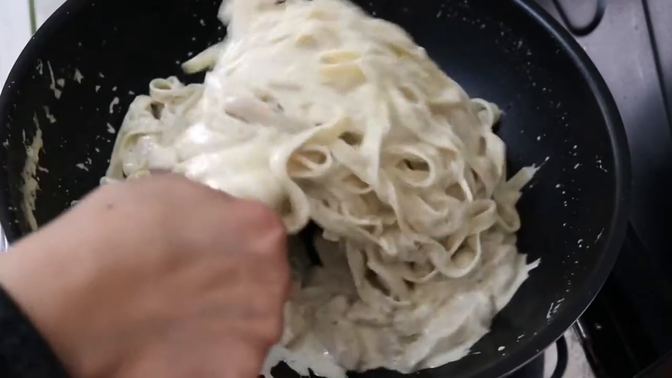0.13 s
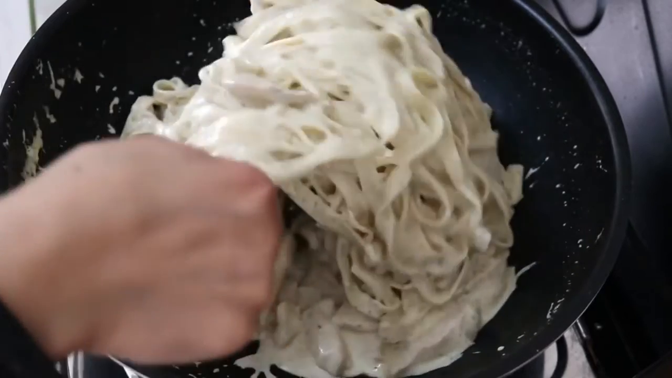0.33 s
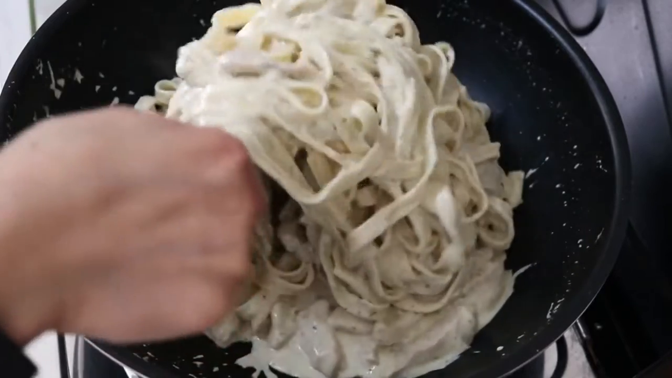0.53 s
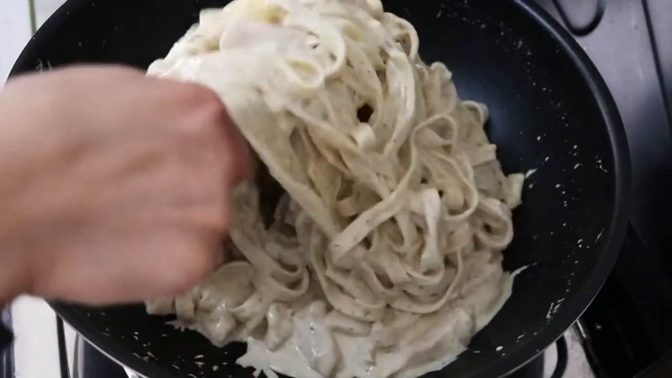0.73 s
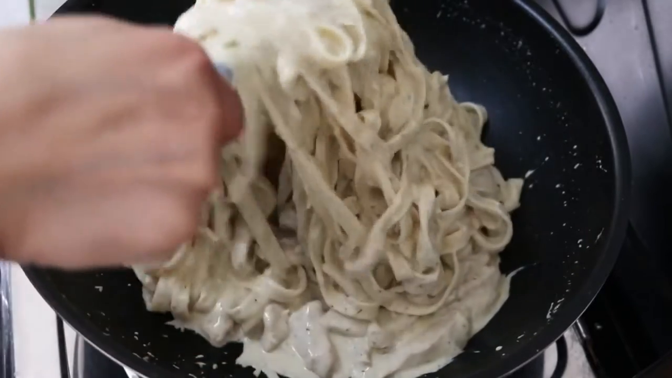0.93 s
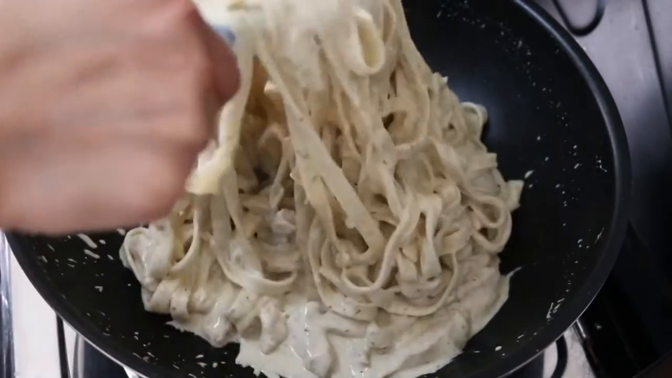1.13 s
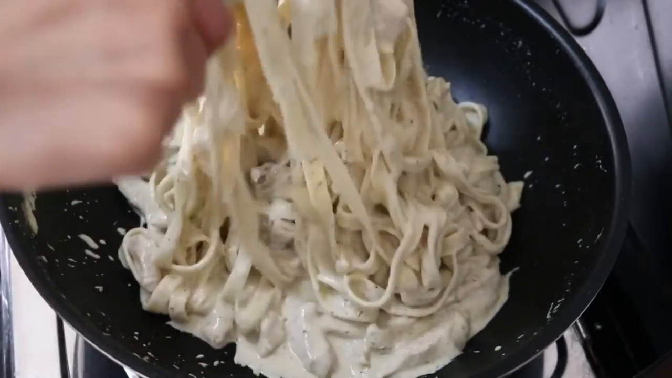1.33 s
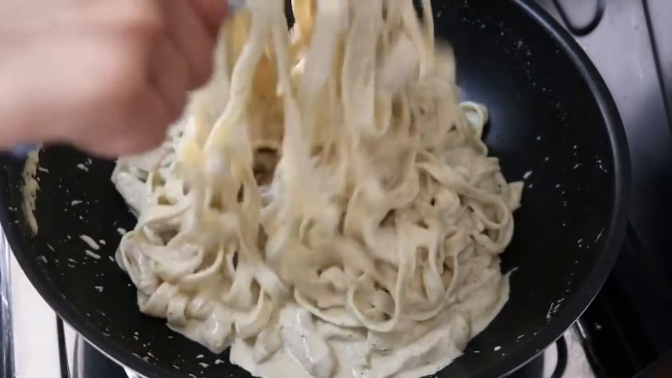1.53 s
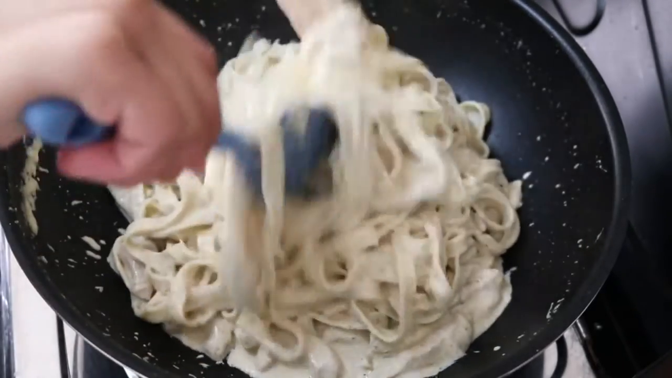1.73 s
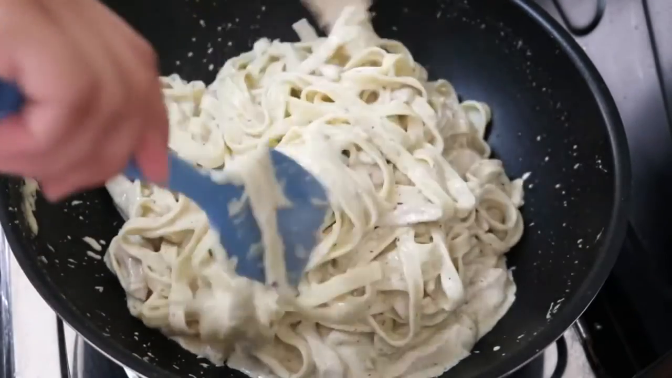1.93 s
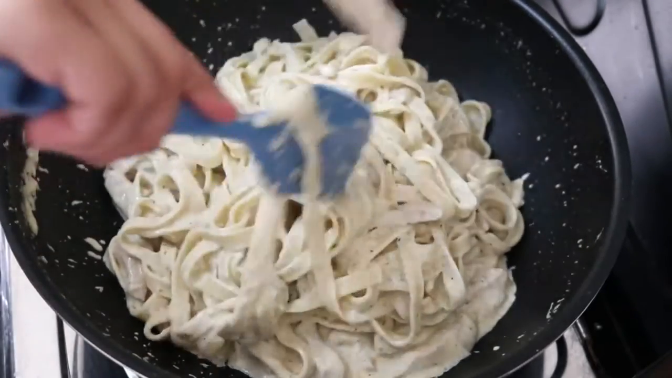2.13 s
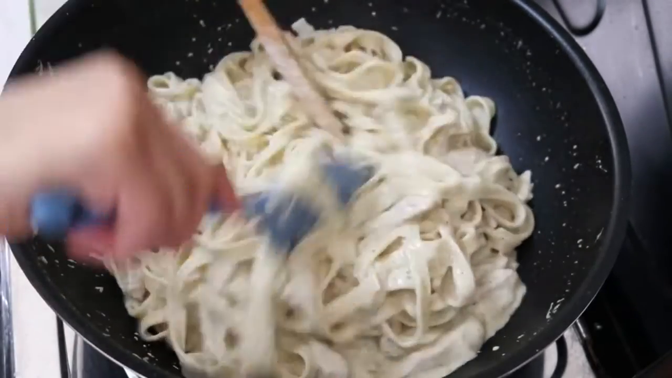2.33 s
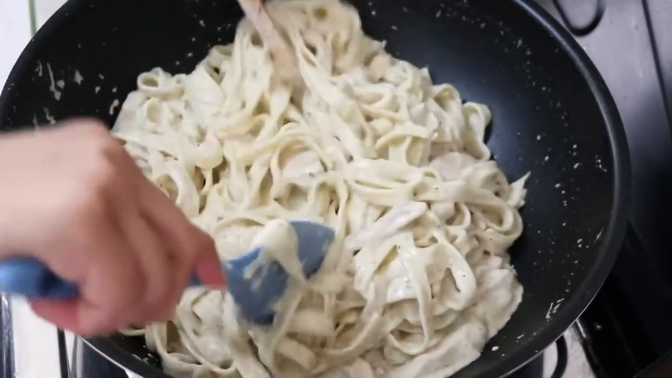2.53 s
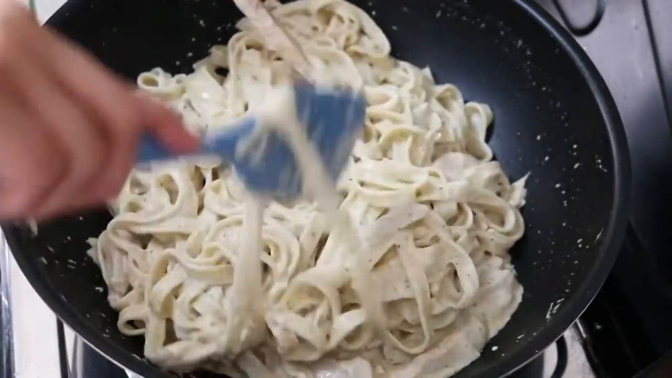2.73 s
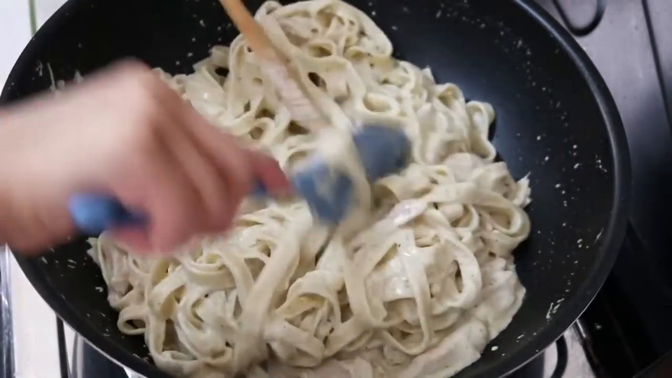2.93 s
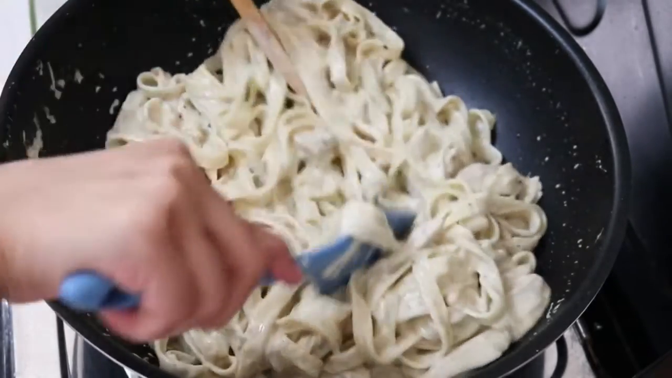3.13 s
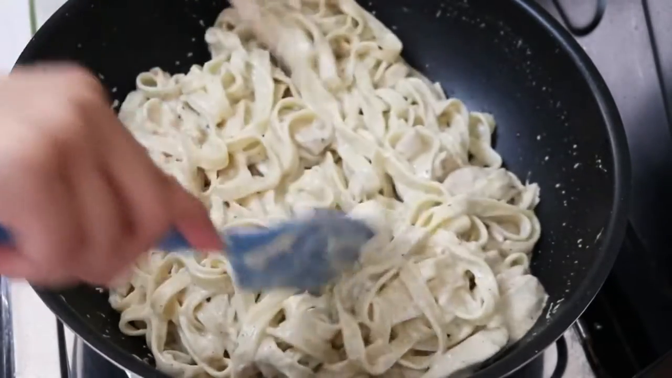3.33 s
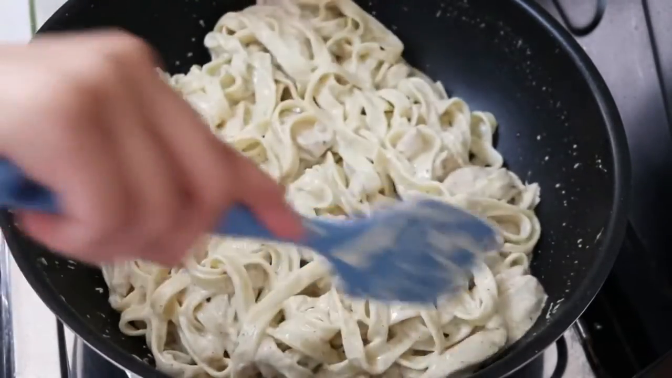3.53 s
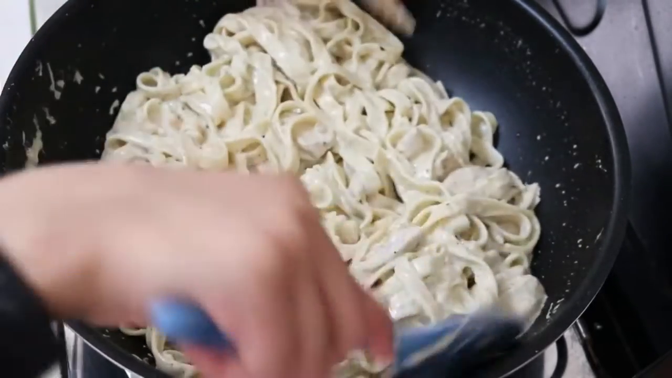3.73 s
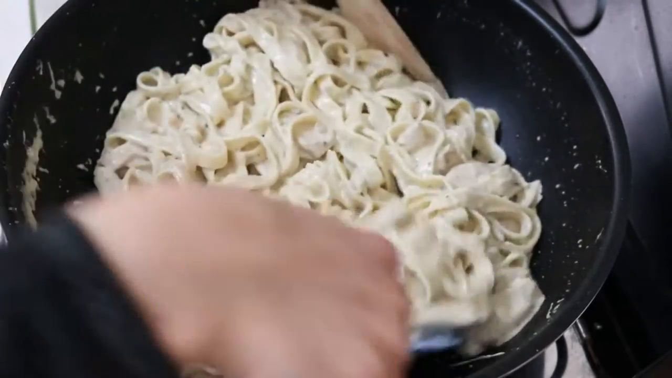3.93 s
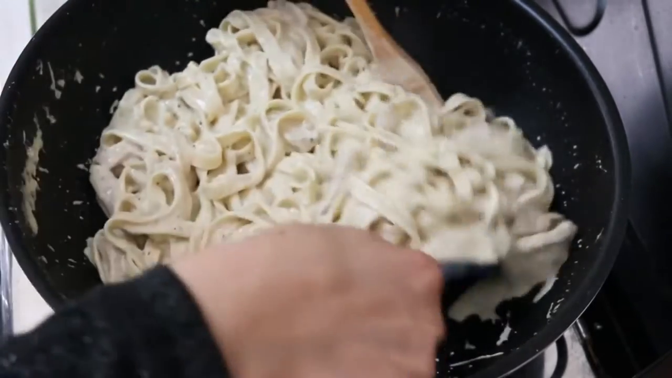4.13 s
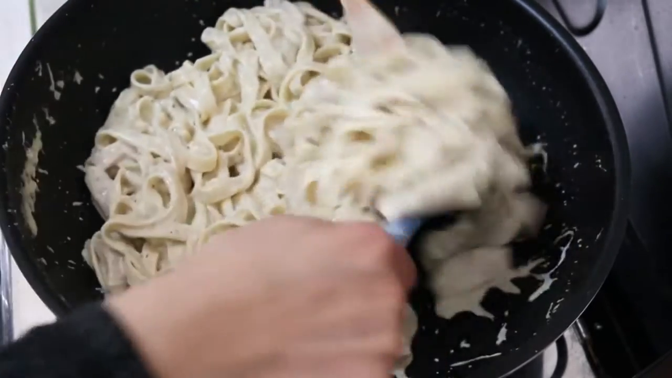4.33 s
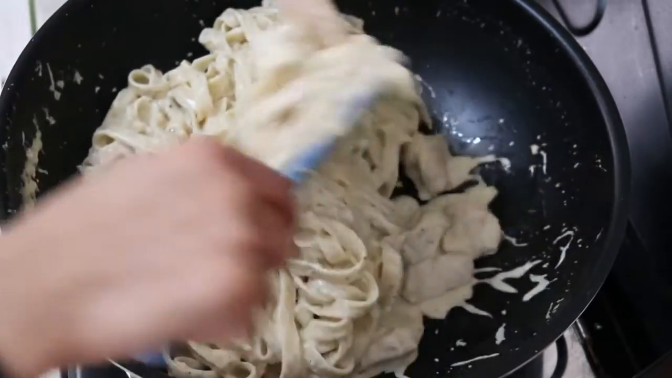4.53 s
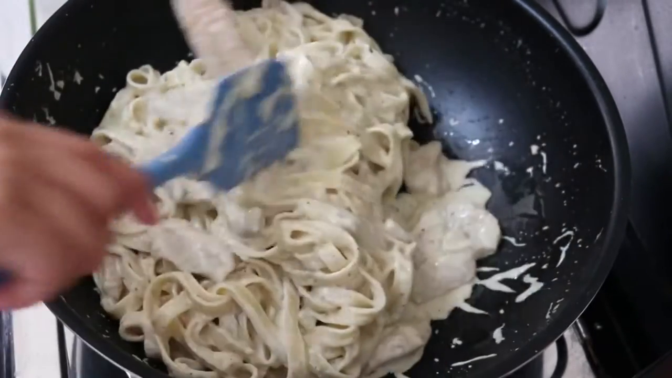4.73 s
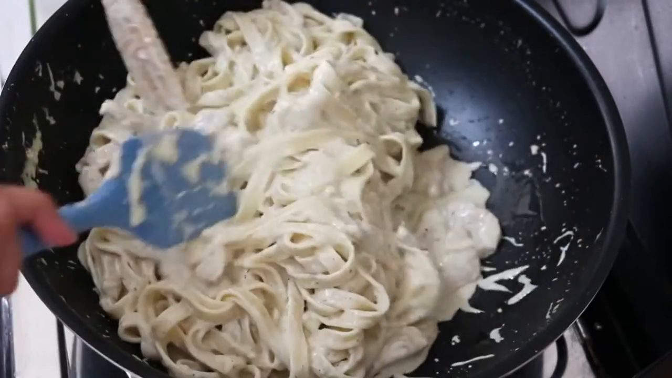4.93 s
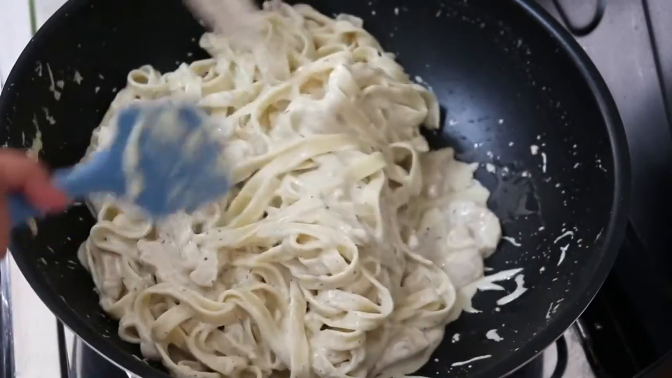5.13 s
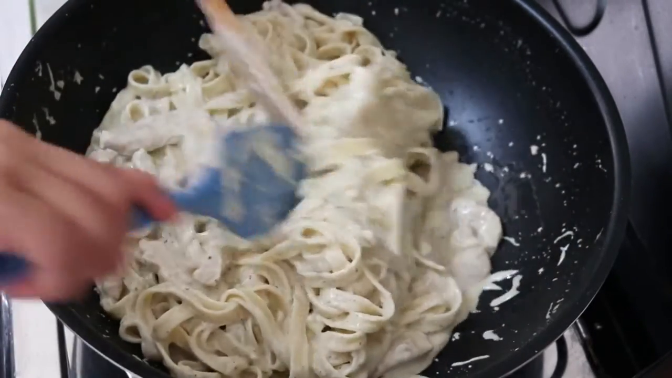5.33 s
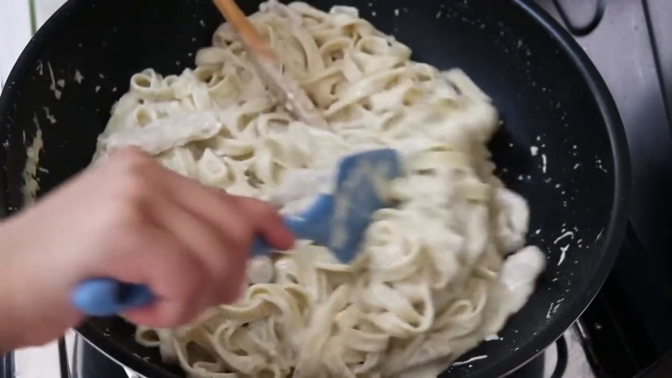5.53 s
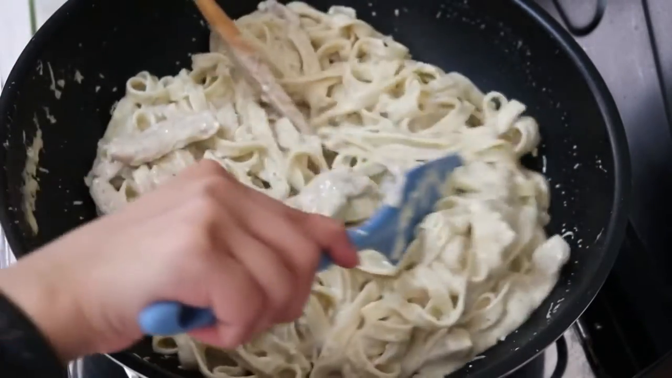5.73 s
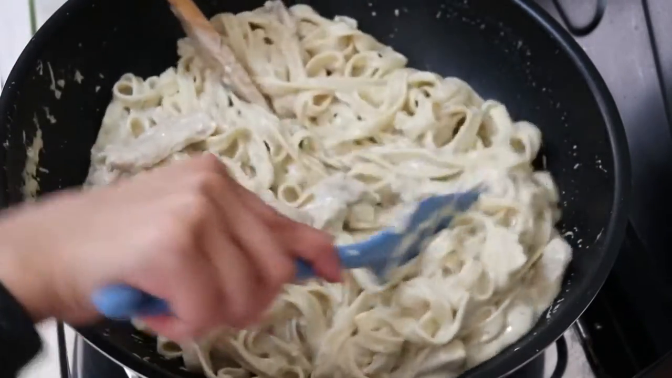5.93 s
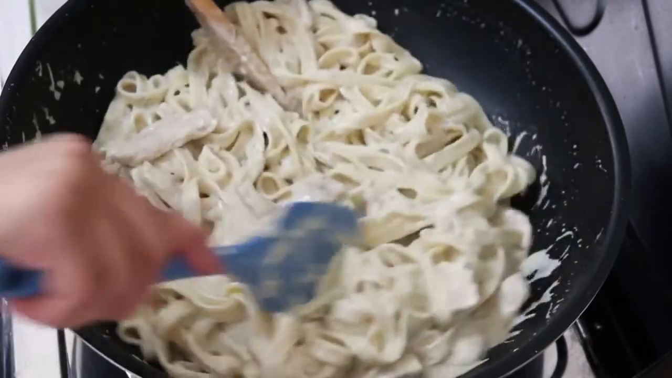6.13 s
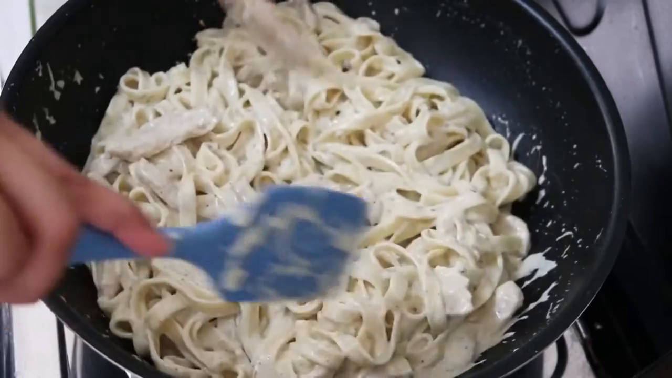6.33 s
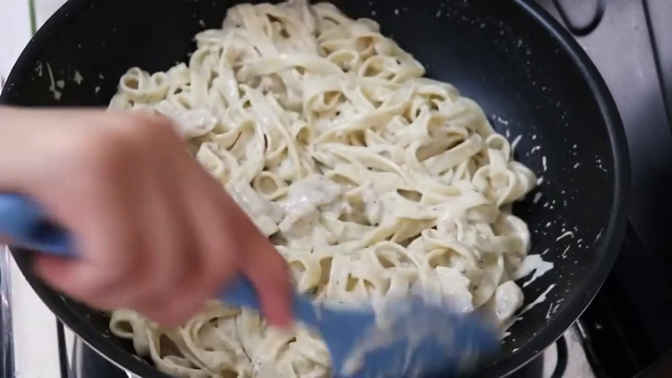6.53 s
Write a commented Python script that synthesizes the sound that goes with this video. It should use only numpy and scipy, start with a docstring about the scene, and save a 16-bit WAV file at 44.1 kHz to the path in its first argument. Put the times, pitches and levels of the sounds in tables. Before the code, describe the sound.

Close, sticky wet stirring of saucy noodles, full of small pops and ticks, with muted pan knocks and a soft appliance hum behind.

```python
"""Pasta in thick cream sauce is lifted, dropped and stirred in a deep pan in a home kitchen.
Air pockets burst as short ringing tones, singly or massed into a squelch; sauce films tick, a tool rubs.
Knocks of the tools ring the food-damped pan as a set of decaying modes with a noisy rattle.
The microphone hears the pan in the middle, without room echo; an appliance hums in sine tones
under a faint stereo hiss of filtered noise."""
import sys
import numpy as np
from scipy import signal
from scipy.io import wavfile

SR = 44100
rng = np.random.default_rng(int(sys.argv[2]) if len(sys.argv) > 2 else 0)


def magnitude_from_level(level_db):
    """Linear magnitude for a level in decibels (20 dB per decade)."""
    exponent = np.asarray(level_db, float) / 20
    return 10 ** exponent


def master(y):
    """Save y as 16-bit WAV."""
    cut = np.clip(np.atleast_2d(y).T, -1, 1)
    pcm = np.round(cut * 32767)  # scale
    wavfile.write(sys.argv[1], SR, pcm.astype(np.int16))


N = 290619


def rms_one(x):
    """Scaled to rms 1."""
    return x / np.sqrt(np.mean(x ** 2) + 1e-20)


def at_hz(points, hz):
    """A (frequency [Hz], value) table read on a log frequency axis."""
    table_hz, values = np.transpose(points)
    return np.interp(np.log(hz), np.log(table_hz), values)


def drift(rate_hz):
    """Slow random wander of rms 1, from twice-smoothed noise at one value per 40 samples."""
    r = np.exp(-80 * np.pi * rate_hz / SR)
    noise = rng.standard_normal(N // 40 + 2002)
    slow = signal.lfilter([1], [1, -2 * r, r * r], noise)[2000:]   # the filter has settled
    return np.interp(np.arange(N) / 40, np.arange(len(slow)), rms_one(slow))


def band_pass(x, low_hz, high_hz):
    """Keeps the sound between two frequencies."""
    return signal.sosfilt(signal.butter(2, [low_hz, high_hz], "band", fs=SR, output="sos"), x)


def high_pass(x, low_hz):
    """Keeps the sound above a frequency."""
    return signal.sosfilt(signal.butter(2, low_hz, "high", fs=SR, output="sos"), x)


def ring(clicks, hz, t60):
    """A resonance: a unit click sets a sine of height about 1 ringing, 60 dB down after t60 seconds."""
    r, w = magnitude_from_level(-60 / (t60 * SR)), 2 * np.pi * hz / SR
    return signal.lfilter([0, np.sin(w)], [1, -2 * r * np.cos(w), r * r], clicks + 1e-18)


def dying_noise(clicks, low_hz, high_hz, t60):
    """Every click starts a band of noise that dies away, 60 dB down after t60 seconds."""
    envelope = signal.lfilter([1], [1, -magnitude_from_level(-60 / (t60 * SR))], clicks + 1e-18)
    noise = band_pass(envelope * rng.standard_normal(N), low_hz, high_hz)
    return noise * np.sqrt(SR / 2 / (high_hz - low_hz))   # level independent of bandwidth


def hiss():
    """Half-octave bands of noise, each wavering slightly; the two sides share the bass most."""
    # spectrum of the hiss: (frequency [Hz], relative density [dB per Hz])
    spectrum = [(25, -1), (50, -5.5), (100, 1), (180, -7), (350, -7), (700, -13.5), (1400, -16),
                (2800, -19), (5600, -18.5), (9000, -17.5), (13000, -25), (16000, -18.5)]
    # stereo width of the hiss: (frequency [Hz], side minus mid [dB])
    side_share = [(60, -20), (300, -12), (1000, -7.5), (3000, -3.5), (7500, -3), (9000, -11), (14000, -9.5)]
    level_db, waver_db = -67.5, 0.4
    out, edges = 0, 25 * 2 ** np.arange(0, 9.6, .5)
    white = rng.standard_normal((2, 2, N))   # alternate bands use separate noise
    for k, (low, high) in enumerate(zip(edges, edges[1:])):
        mid, side = band_pass(white[k % 2], low, high)
        hz = np.sqrt(low * high)
        both = mid + magnitude_from_level(at_hz(side_share, hz)) * side * [[1], [-1]]
        out = out + magnitude_from_level(at_hz(spectrum, hz) + waver_db * drift(13.0)) * both
    return magnitude_from_level(level_db) * rms_one(out)


def hum():
    """The appliance: a nearly steady motor tone, and a low hum of uneven level under it."""
    # the low hum's level: (time [s], level [dB rms])
    low_levels = [(0.0, -77), (0.22, -69), (0.62, -84), (0.99, -67), (1.27, -81), (1.72, -64.5),
                  (1.78, -74), (2.88, -75), (3.01, -66), (4.2, -77), (4.37, -65), (4.68, -76.5),
                  (6.52, -74), (6.59, -100)]
    motor_hz, low_hz, motor_db, waver_db = 295.4, 99.5, -70, 1
    t = np.arange(N) / SR
    s, low_db = np.transpose(low_levels)
    low = magnitude_from_level(np.interp(t, s, low_db)) * np.sin(2 * np.pi * low_hz * t + 0.34 * drift(5.5))
    motor = np.sin(2 * np.pi * motor_hz * t + 0.074 * drift(3.8))   # its phase wanders a little
    motor = magnitude_from_level(motor_db + waver_db * drift(1.0)) * motor
    return np.sqrt(2) * (low + motor)   # rms to peak


def stir():
    """Fine and deep stirring levels in dB: each stroke rises, holds and settles; strokes add."""
    # strokes of the tools through the pasta: (full level from [s], hold [s], fine crackle [dB],
    # deep squelch over it [dB], settling [dB/s])
    strokes = [(0.0, 0.026, -70.5, 1, 122), (0.114, 0.12, -68, 2.5, 67), (0.25, 0.38, -68, -14, 17.5),
               (1.473, 0.11, -81, -2, 60), (1.71, 0.14, -73, -2.5, 101), (2.319, 0.14, -66.5, 5, 100),
               (2.52, 0.24, -69.5, 0, 161), (2.996, 0.41, -65.5, 0, 196), (4, 0.18, -66, 1, 61),
               (4.367, 0.31, -68.5, -3, 76), (4.798, 0.25, -78.5, 0.5, 51), (5.406, 0.12, -64.5, -1, 102),
               (5.555, 0.03, -67.5, -11, 90), (5.758, 0.26, -68, -1, 88), (6.192, 0.049, -71, -1, 87)]
    attack_db_per_s, at_rest_db = 341, -95.5
    now = np.arange(0, N, 32) / SR
    fine, deep = magnitude_from_level(at_rest_db), magnitude_from_level(at_rest_db)
    for s, hold_s, db, deep_db, settle in strokes:
        rising = (now - s) * attack_db_per_s
        settling = (s + hold_s - now) * settle
        gain = magnitude_from_level(db + np.minimum(0, np.minimum(rising, settling)))
        fine, deep = fine + gain, deep + gain * magnitude_from_level(deep_db)
    return [np.interp(np.arange(N) / SR, now, 20 * np.log10(level)) for level in (fine, deep)]


def squelch(level_db, low_hz, high_hz, per_s, cycles, uneven_db, clump_db, top_loss_db):
    """Countless small pockets burst in clumps; ringing twice over gives each a soft start and a clear pitch."""
    colour_shift_db, colour_shift_hz = 2.5, 14   # pocket sizes come and go as the pasta moves
    sizes = magnitude_from_level(uneven_db * np.minimum(rng.exponential(1, N), 4)) * rng.choice([-1, 1], N)
    born = rng.random(N) < per_s * magnitude_from_level(clump_db * drift(20)) / SR
    pitch_index, at = rng.integers(0, 32, N), np.flatnonzero(born)
    favoured = [magnitude_from_level(colour_shift_db * drift(colour_shift_hz)) for _ in range(4)]   # four size classes
    out = 0
    for k, hz in enumerate(np.geomspace(low_hz, high_hz, 32)):
        mine, clicks = at[pitch_index[at] == k], np.zeros(N)
        clicks[mine] = sizes[mine] * favoured[k // 8][mine] * magnitude_from_level(-top_loss_db * (k / 31) ** 4)
        t60 = cycles / hz
        out = out + hz ** 1.76 * ring(ring(clicks, hz, t60), hz, t60)
    return magnitude_from_level(level_db) * rms_one(out)


def rub(deep_db):
    """The tool slides through the sauce: an uneven swish of mid-band noise following the deep squelch."""
    under_squelch_db, unevenness_db = -6, 3.2
    swish = rms_one(band_pass(rng.standard_normal(N), 565, 3000))
    return magnitude_from_level(deep_db + under_squelch_db + unevenness_db * drift(32)) * swish


def knocks():
    """Each row drives all pan modes through a soft contact that rebounds once; a rattle dies behind it."""
    # blows on the pan and renewed swells of its ringing; each favours one pitch region:
    # (time [s], drive level [dB], favoured pitch [Hz], fall below it [dB/octave], fall above it [dB/octave])
    drives = np.array([(0.034, -43, 396, 23, 23), (0.0593, -47, 397, 19, 15), (2.505, -32.5, 620, 8.5, 17),
                       (2.52, -36.5, 400, 9.3, 11), (2.682, -35, 1300, 4.1, 12),
                       (2.769, -34.5, 610, 5.9, 13), (2.781, -42.5, 387, 10, 8), (2.844, -60, 397, 12, 25),
                       (2.975, -42, 420, 9.4, 12), (3.04, -30, 1080, 3.8, 0), (3.048, -34, 1030, 8.3, 6),
                       (3.284, -49.5, 330, 9.4, 11), (3.355, -30.5, 584, 4.8, 6.5),
                       (3.446, -39.5, 543, 7.2, 11), (3.786, -40, 188, 3.5, 8),
                       (3.806, -45.5, 550, 6.3, 26), (3.879, -34, 1010, 3, -2),
                       (3.887, -39.5, 970, 4.2, -1), (3.934, -44.5, 960, 1.9, 15),
                       (4.313, -24, 600, 7, 7.5), (4.316, -29, 1360, 34, 13), (4.367, -34.5, 1350, 4, 26),
                       (4.4267, -28, 326, 68, 90), (4.975, -56.5, 1300, 9.1, -2),
                       (5.5715, -29.5, 990, 3.3, 1.5), (5.5795, -35.5, 990, 12, 9),
                       (5.762, -47.5, 437, 37, 25), (6.229, -31.5, 660, 7.2, 13.5),
                       (6.232, -38.5, 1330, 16, 32), (6.25, -34.5, 440, 15, 10.5),
                       (6.285, -36.5, 654, 9, 13), (6.2994, -35.5, 427, 86, 90), (6.448, -55, 200, 6.7, 18)])
    # modes of the pan, damped by the food: (frequency [Hz], level [dB], t60 [s])
    pan_modes = [(157, -8, 0.32), (194.8, -5, 0.18), (239.7, -15.5, 0.86), (284.7, -14, 0.54),
                 (326.3, -14.5, 0.65), (389.2, -3, 0.24), (423.4, -15, 0.9), (452, -15.5, 0.19),
                 (482, -27, 0.22), (537, -21, 0.91), (604.2, -3, 0.16), (653, -11.5, 0.12),
                 (681.4, -1.5, 0.13), (809, -11.5, 0.081), (870, -17, 0.093), (984.5, 1.5, 0.074),
                 (972.5, -9, 0.16), (1018, -13.5, 0.46), (1086, 0.5, 0.12), (1140, -19.5, 0.63),
                 (1195, -13, 0.086), (1376, -2, 0.076), (1335, -10.5, 0.2), (1618, -4, 0.06),
                 (1680, -18, 0.23), (1820, 1, 0.079), (1774, -15, 0.35), (2002, -22, 0.091),
                 (2054, -2.5, 0.11), (2593, -1, 0.09)]
    # rattle bands of the pan, one value a band: (centre [Hz])
    rattle_hz = [190, 390, 620, 1000, 1500]
    # and in the same order: (level [dB])
    rattle_levels = [-17, -21.5, -17, -12.5, -9]
    # and their decay: (t60 [s])
    rattle_t60 = [0.66, 1, 0.49, 0.39, 0.23]
    scatter_db = 2.5
    contact_s, rebound_s, rebound_gain = 0.00069, 0.00698, 0.07
    smack_db, smack_t60 = -10, 0.11
    s, drive_db, favoured_hz, fall_below, fall_above = drives.T
    at = np.round(s * SR).astype(int)

    def colour(hz):
        """Drive of every row at one frequency, in dB."""
        slope = np.where(hz < favoured_hz, fall_below, fall_above)
        return drive_db - np.abs(np.log2(hz / favoured_hz)) * slope

    def push(centre_s):
        """Soft contact: a bell-shaped push."""
        t = np.arange(1024) / SR
        return np.exp(-((t - centre_s) / contact_s * 4) ** 2) / (contact_s * SR / 2)

    scatter = rng.normal(0, scatter_db, (len(drives), len(pan_modes)))
    out, clicks = np.zeros(N), np.zeros(N)
    for k, (hz, level_db, t60) in enumerate(pan_modes):
        sign = (-1) ** ((k + 1) // 4)   # nodal lines flip some modes
        clicks[at] = magnitude_from_level(colour(hz) + level_db + scatter[:, k]) * sign
        out += ring(clicks, hz, t60)
    for hz, rattle_db, t60 in zip(rattle_hz, rattle_levels, rattle_t60):
        clicks[at] = magnitude_from_level(colour(hz) + rattle_db)
        out += dying_noise(clicks, hz / 1.77, hz * 1.37, t60)
    out = signal.fftconvolve(out, push(contact_s) + rebound_gain * push(rebound_s))[:N]
    out = high_pass(out, 110)
    # sauce smacks at the blow, driven more weakly than the top rattle band
    return out + dying_noise(clicks * magnitude_from_level(smack_db), 1600, 3720, smack_t60)


def stray_pops(fine_db):
    """Rows of further pockets at random moments and pitches, rather louder when the stirring is."""
    per_s, spread_db, low_hz, high_hz = 12, 2, 1300, 9060
    level_db, follows = -55.5, 0.29   # level at a -63 dB stroke; share of its swing
    when, pitch, size = rng.random((200, 3)).T
    s = np.cumsum(-np.log(1 - when)) / per_s
    stroke_db = np.interp(s * SR, np.arange(N), fine_db)
    db = level_db + spread_db * (2 * size - 1) + follows * (stroke_db + 63.0)
    rows = zip(s, db, low_hz * (high_hz / low_hz) ** pitch)
    return [row for row in rows if row[0] * SR < N]


def pops(stray_rows):
    """A pocket swells open and rings some cycles, rising in pitch; the tearing film adds a puff of noise."""
    # single air pockets bursting, loud and soft: (time [s], level [dB], pitch [Hz])
    single_rows = [(0.0992, -42, 2670), (0.142, -40.5, 890), (0.1445, -45, 1720), (0.29, -55, 1100),
                   (0.2304, -41.5, 1790), (0.263, -55, 5000), (0.321, -45, 1890), (0.399, -41.5, 5260),
                   (0.4456, -47.5, 2200), (0.508, -46.5, 7470), (0.5516, -46, 5800), (0.589, -54, 3040),
                   (0.679, -47, 5300), (0.409, -47, 2270), (0.523, -47, 7450), (0.6118, -52.5, 2770),
                   (0.6542, -51, 4400), (0.764, -58, 6550), (0.8248, -63, 6750), (0.8737, -50.5, 4660),
                   (1.0019, -53, 6000), (1.098, -52, 2860), (1.1376, -51.5, 8460), (1.3122, -53, 5240),
                   (1.389, -59, 7310), (1.409, -59, 4080), (1.616, -54, 7640), (4.017, -49, 4330),
                   (4.05, -48.5, 2810), (4.208, -45, 1500), (4.258, -51, 4880), (5.996, -48, 6000),
                   (6.104, -56, 3900), (6.127, -50, 6570), (5.93, -53, 4870), (0.7385, -43.5, 3560),
                   (0.839, -48, 7100), (0.9308, -51, 7200), (0.965, -47, 4500), (1.088, -48.5, 2740),
                   (1.1587, -48.5, 5960), (1.4426, -50, 4860), (1.5156, -50, 7900), (1.243, -54, 1110),
                   (1.5, -54, 1500), (1.5247, -47.5, 7540), (1.706, -51, 5230), (1.7377, -55, 7500),
                   (1.8036, -54, 4150), (1.862, -51.5, 7050), (1.538, -45, 1300), (1.547, -47.5, 2460),
                   (1.583, -53, 5730), (1.6397, -49.5, 5860), (1.6931, -52, 2900), (1.7634, -45, 1680),
                   (1.795, -42.5, 1100), (1.8178, -49.5, 1850), (1.8442, -52, 4220), (1.9006, -51, 3000),
                   (1.953, -53, 8200), (2.2288, -46, 1930), (2.247, -45, 3350), (2.265, -53, 2000),
                   (2.308, -44.5, 925), (2.468, -41, 700), (2.3952, -42, 1740), (2.4658, -47.5, 1780),
                   (2.5351, -51, 6900), (2.606, -46, 4300), (2.6374, -44.5, 2620), (2.7444, -45.5, 1900),
                   (2.811, -49, 6800), (3.0031, -48.5, 3060), (3.1454, -42.5, 5130), (3.468, -46, 3000),
                   (4.114, -41, 1810), (4.152, -40.5, 1660), (4.334, -38, 1500), (4.4024, -44, 2170),
                   (4.4194, -47, 6200), (4.486, -46, 4300), (4.5137, -44.5, 2080), (4.567, -50.5, 5000),
                   (4.629, -46, 1800), (4.664, -43, 1910), (4.6452, -46.5, 2700), (4.6946, -43, 1840),
                   (4.7315, -44.5, 4030), (4.783, -44.5, 7040), (4.7964, -44.5, 1820),
                   (4.8489, -45.5, 5000), (4.88, -53, 1500), (4.949, -51.5, 1300), (4.981, -51, 7150),
                   (4.972, -55, 3700), (5.038, -56, 3880), (5.105, -52, 3300), (5.112, -57, 2410),
                   (5.155, -55, 1300), (5.222, -60, 2000), (5.287, -55, 1500), (5.411, -46, 3680),
                   (5.365, -48, 985), (5.378, -49.5, 3530), (5.454, -42, 1010), (5.4668, -44, 2980),
                   (5.5222, -47, 4350), (5.5586, -58, 1960), (5.766, -42, 1490), (5.7907, -50, 3600),
                   (5.8405, -40.5, 3200), (5.875, -39, 2880), (5.8863, -36, 1980), (5.897, -42, 2170),
                   (5.9963, -49, 1730), (6.0342, -40.5, 1890), (5.68, -48.5, 5430), (5.9494, -49, 2270),
                   (5.9765, -48.5, 3600), (6.065, -49.5, 1610), (6.0911, -45, 6900), (6.137, -48.5, 1990),
                   (6.1954, -52, 2030), (6.507, -53, 1970)]
    cycles_at_3_khz, pitch_power = 11, 0.77   # small, high pockets ring for more cycles
    pitch_rise, open_cycles = 0.051, 1.0
    tear_db, tear_s, tear_spread = -8, 0.0037, 1.217   # spread: band edge over pitch
    rows = single_rows + stray_rows
    out, t = np.zeros(N + 2048), np.arange(2048) / SR
    noise = rng.standard_normal((len(rows), 2048))
    for (s, db, hz), puff in zip(rows, noise):
        cycles = cycles_at_3_khz * (hz / 3000) ** pitch_power
        life = t * hz / max(cycles, 2)
        opening = 1 - np.exp(-t * hz / open_cycles)
        glide = 1 + pitch_rise * (np.minimum(life, 1) - .5)
        tone = np.sin(2 * np.pi * hz * t * glide) * magnitude_from_level(-25 * life)
        tear = rms_one(band_pass(puff, hz / tear_spread, min(hz * tear_spread, 16000)))
        tear = tear * magnitude_from_level(tear_db) * np.exp(-t / tear_s)
        start = round(s * SR)
        out[start:start + 2048] += magnitude_from_level(db) * opening * (tone + tear)
    return out[:N]


def snaps(fine_db):
    """Films of sauce part with thin, pitchless ticks; the random ones are louder while the pasta moves."""
    # the sharpest films parting: (time [s], click level before filter and lift [dB])
    sharp_ticks = [(0.729, -45.5), (0.9472, -46), (1.197, -53), (1.373, -42.5), (1.4361, -44.5),
                   (1.9015, -48), (4.213, -50), (4.283, -50), (4.6294, -48), (4.6818, -54), (4.781, -53),
                   (5.3882, -53), (5.473, -59), (6.317, -47.5)]
    per_s, spread_db = 32, 3.5
    level_db, follows = -54.5, 0.17   # base level at a -73 dB stroke; share of its swing
    born = rng.random(N) < per_s / SR
    spread = spread_db * np.minimum(rng.exponential(1, N), 3)
    sizes = magnitude_from_level(level_db + spread + follows * (fine_db + 73))
    s, tick_db = np.transpose(sharp_ticks)
    sharp = np.full(N, 1e-18)
    sharp[np.round(s * SR).astype(int)] = magnitude_from_level(tick_db)
    return high_pass(born * sizes + 1e-18, 1500) + 3.5 * high_pass(sharp, 8000)


def bowl(x, size=2048):
    """Dense short echoes from the pan wall; their pattern changes as the sound moves from spot to spot."""
    echo_t60_s, echo_db = 0.042, -3.5
    t, out = np.arange(4096) / SR, x.copy()
    spot = rng.integers(0, 5, N // size + 2)   # one of five spots every `size` samples
    for k, noise in enumerate(rng.standard_normal((5, 4096))):
        tail = noise * magnitude_from_level(-60 * t / echo_t60_s) * (t > .001)
        here = np.sqrt(np.interp(np.arange(N) / size, np.arange(len(spot)), spot == k))
        out += magnitude_from_level(echo_db) * signal.oaconvolve(x * here, tail / np.linalg.norm(tail))[:N]
    return out


def scene():
    """Wet sounds echo in the pan; knocks, hum and hiss join them."""
    fine_db, deep_db = stir()
    deep = squelch(deep_db, low_hz=450, high_hz=2500, per_s=2000, cycles=10,
                   uneven_db=3.5, clump_db=3, top_loss_db=2)
    fine = squelch(fine_db, low_hz=2800, high_hz=12500, per_s=1300, cycles=13,
                   uneven_db=4, clump_db=5, top_loss_db=15)
    wet = pops(stray_pops(fine_db)) + snaps(fine_db) + deep + fine + rub(deep_db)
    return bowl(wet) + knocks() + hum() + hiss()


def low_pass(x):
    """Removes everything above the highest recorded frequency."""
    return signal.sosfilt(signal.butter(12, 16460, fs=SR, output="sos"), x)


def record(dry):
    """The microphone's top is cut steeply near 16 kHz."""
    cut = signal.sosfilt(signal.cheby2(12, 50, 16300, fs=SR, output="sos"), dry)   # 50 dB down at 16300 Hz
    return low_pass(cut)


dry = scene()
out = record(dry)
master(out)
```